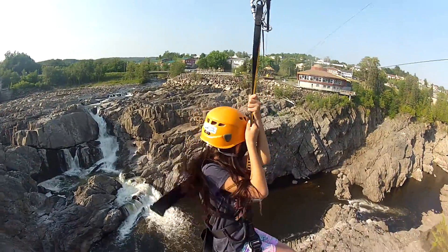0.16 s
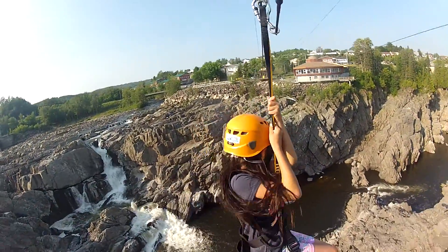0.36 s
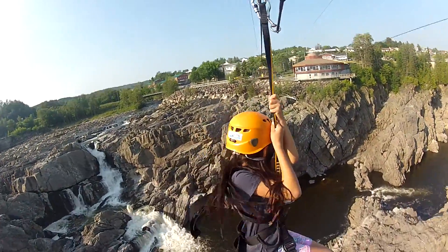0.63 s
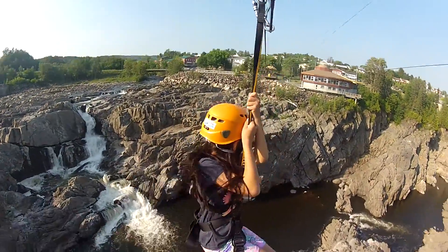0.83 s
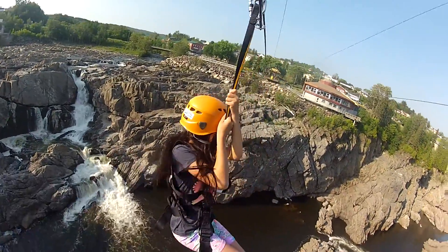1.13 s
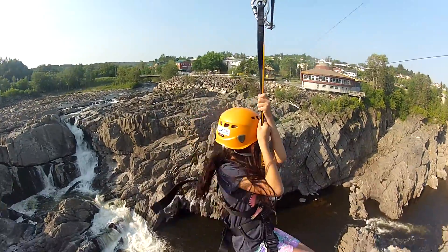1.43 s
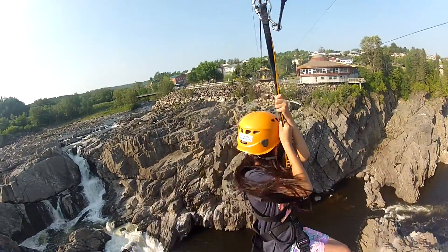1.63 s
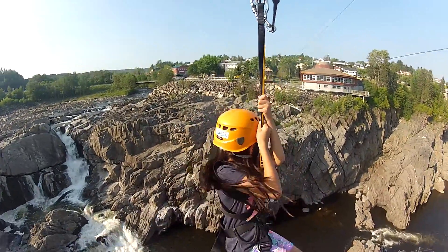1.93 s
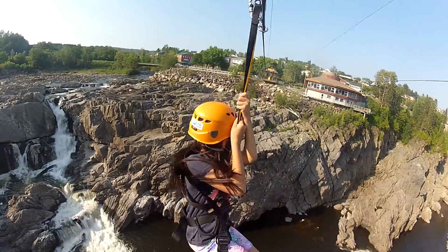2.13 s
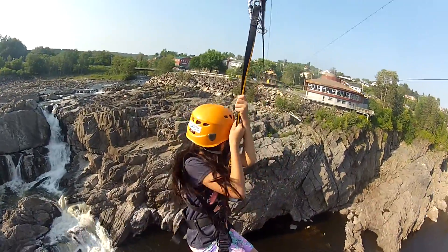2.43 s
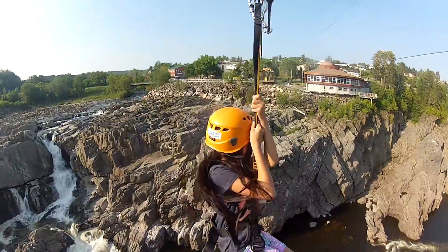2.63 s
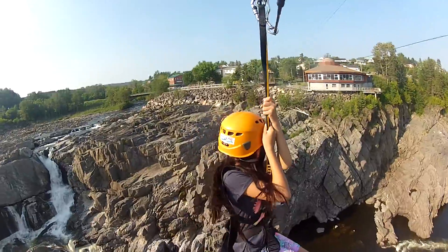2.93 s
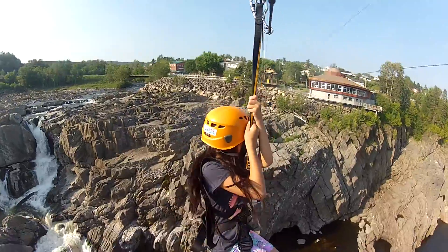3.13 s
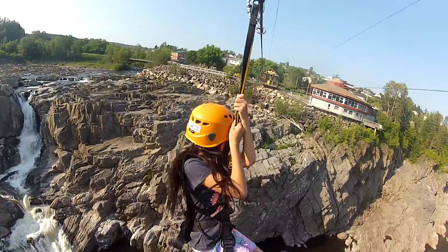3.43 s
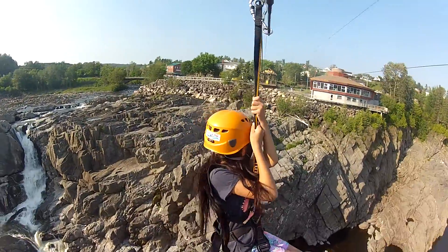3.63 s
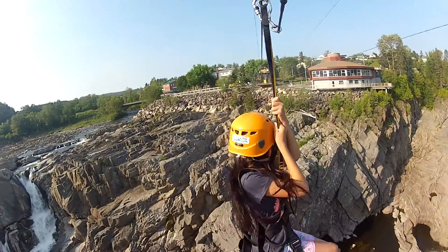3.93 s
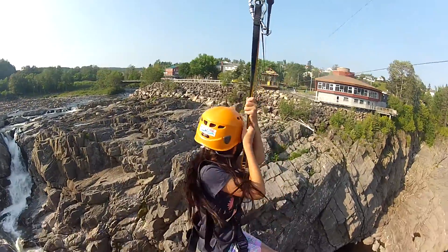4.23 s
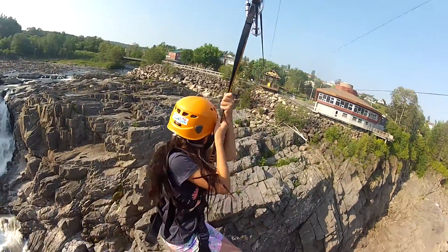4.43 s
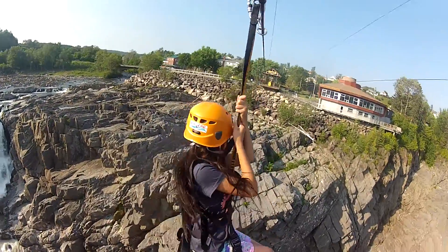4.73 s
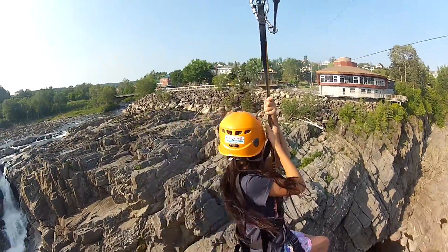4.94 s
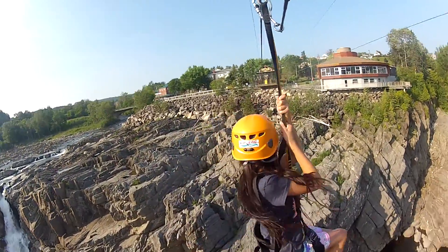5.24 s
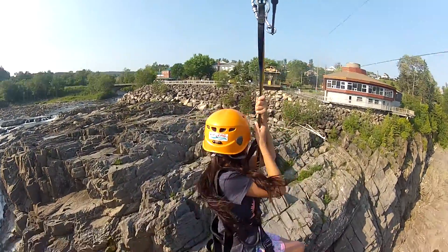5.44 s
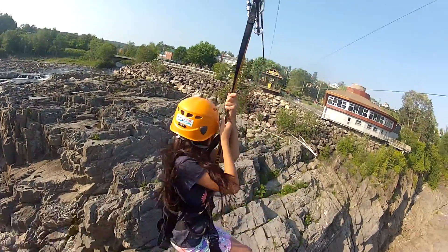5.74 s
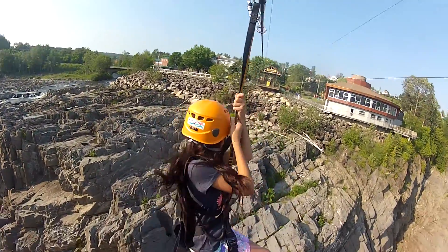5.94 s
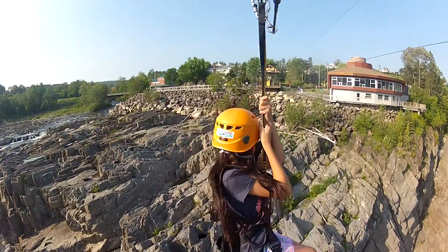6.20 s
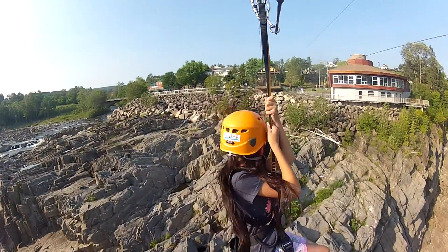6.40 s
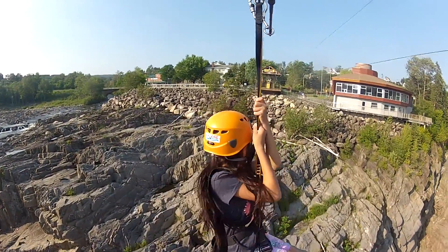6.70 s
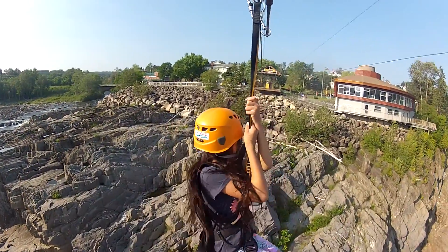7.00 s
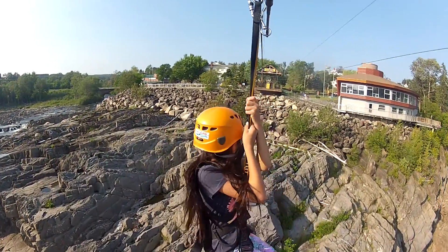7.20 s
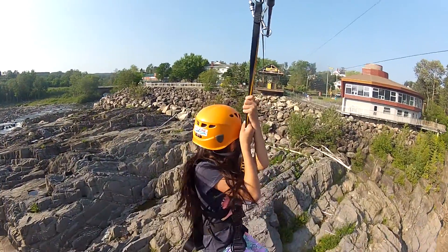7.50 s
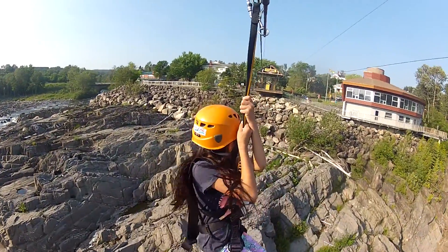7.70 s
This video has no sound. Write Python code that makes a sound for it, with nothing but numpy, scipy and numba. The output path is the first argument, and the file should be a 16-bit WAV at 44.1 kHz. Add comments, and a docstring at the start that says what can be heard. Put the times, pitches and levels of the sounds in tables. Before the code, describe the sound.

A zipline pulley rattles along a steel cable with a slowly falling whine, scattered knocks and wind rumbling on the microphone.

```python
"""Trolley slowing on a zipline

Steel wheels roll along a cable above a small camera in a closed case, and wind rumbles on the case.
Contact ticks and jolts excite the resonances of the trolley frame, and the cable strands passing under
the wheels whine, lower as it slows. The camera limits peaks; its coarse sampling adds mirrored treble."""
import sys
import numpy as np
from scipy import signal
from scipy.fft import rfft, irfft
from scipy.io import wavfile
from scipy.ndimage import uniform_filter1d, minimum_filter1d
from numba import njit

SR = 44100
rng = np.random.default_rng(int(sys.argv[2]) if len(sys.argv) > 2 else 0)


def dump_mix(stems):
    """Bounce the given channels to the path in sys.argv[1] as a 16-bit WAV at rate SR."""
    frames = np.atleast_2d(stems).T  # one column per channel
    limited = np.clip(frames, -1, 1)  # hard clip at full scale
    pcm = np.round(limited * 32767).astype(np.int16)
    wavfile.write(sys.argv[1], SR, pcm)


N = 346626


def undb(db):
    return 10 ** (np.asarray(db) / 20)


def at_rms(x, db):
    return x * undb(db) / np.sqrt(np.mean(x ** 2))


def curves(table):
    """Linear interpolation of each column over the times in the first."""
    times, *columns = np.transpose(table)
    return [np.interp(np.arange(N) / SR, times, column) for column in columns]


def wander(rate_hz):
    """Low-pass noise: random steps, smoothed twice, with a spread near 1."""
    hold = int(SR / rate_hz)
    steps = np.repeat(rng.standard_normal(N // 50), hold)[:N]
    return 1.24 * uniform_filter1d(uniform_filter1d(steps, hold), hold)


def minimum_phase(gain, size=4096):
    """Folding the cepstrum gives the most compact causal response with this gain."""
    cepstrum = irfft(np.log(gain), size)
    cepstrum[1:size // 2] *= 2
    cepstrum[size // 2 + 1:] = 0
    return irfft(np.exp(rfft(cepstrum)), size)[:size // 2]


# Spectrum of the wind. Each row: frequency in Hz, relative spectral density in dB.
WIND_SPECTRUM = [(12, -33), (20, -9), (97, 0.5), (172, -2.5), (321, -8.5), (450, -7), (580, -53),
                 (990, -120)]
# Gusts on the case. Each row: time in seconds, level in dB, relative level of the deep band in dB.
WIND_GUSTS = [(0, -30.5, -5), (.4, -40, -6), (.6, -35, -2), (1.3, -36.5, -7), (1.9, -37.5, -10),
              (2.3, -36, -6), (2.85, -38.5, -12), (3.0, -40.5, -12), (3.95, -39.5, -5), (4.15, -40, -8),
              (5.1, -36.5, -13), (5.5, -37.5, -9), (6.1, -36, -4), (6.7, -42.5, -9), (6.95, -37.5, -5),
              (7.4, -42, -16), (7.86, -38.5, -5)]
# Brief buffets and lulls. Each row: centre in seconds, length in seconds, level change in dB.
WIND_BUFFETS = [(.05, 0.11, -0.5), (0.187, .03, -3), (1.01, .05, 5), (1.3, .07, 5), (2.187, .04, 4),
                (2.885, .05, 7), (4.543, .05, 5.5), (5.078, 0.043, 5), (5.92, 0.057, 6.5),
                (6.144, 0.047, 9)]

def wind(split_hz=60):
    """Turbulent pressure on the case is low noise in gusts; the deep band also swells on its own."""
    hz, density_db = np.transpose(WIND_SPECTRUM)
    bins_hz = np.linspace(1, SR / 2, N // 2 + 1)
    spectrum = rfft(rng.standard_normal(N)) * undb(np.interp(np.log(bins_hz), np.log(hz), density_db))
    gust_db, deep_db = curves(WIND_GUSTS)
    rumble = at_rms(irfft(spectrum * (bins_hz > split_hz), N), 0)
    deep = at_rms(irfft(spectrum * (bins_hz <= split_hz), N), 0)
    deep *= undb(deep_db + 2.5 * wander(7.1))
    t = np.arange(N) / SR
    buffet_db = sum(db * np.exp(-(2 * (t - centre) / length) ** 4) for centre, length, db in WIND_BUFFETS)
    flutter_db = wander(12) + 0.56 * wander(25)
    return (rumble + deep) * undb(gust_db + buffet_db + flutter_db)


# Strands passing under the wheel. Each row: time in seconds, pitch in Hz, fundamental's drive in dB.
STRAND_PASSAGE = [(0, 712, -44), (1.2, 693, -45), (2.0, 679, -48), (2.9, 662, -41.5), (3.5, 647.5, -42.5),
                  (4.5, 615, -43.5), (5.0, 591.5, -40), (5.55, 564.5, -38.5), (5.95, 551, -44),
                  (7.2, 499, -48), (7.55, 484, -39), (7.86, 472, -38)]

def strand_whine(octave_db=-52):
    """Periodic forcing at the strand-passing rate: two harmonics that waver with the wheel's grip."""
    hz, db = curves(STRAND_PASSAGE)
    phase = 2 * np.pi * np.cumsum(hz * (1 + .001 * wander(6))) / SR
    grip = undb(wander(6))
    return np.sqrt(2) * grip * (undb(db) * np.sin(phase) + undb(octave_db) * np.sin(2 * phase))


# Hardest jolts of the wheels on the cable. Each row: time in seconds, peak of the push in dB.
WHEEL_JOLTS = [(.226, -9), (1.822, -10), (2.036, -5), (2.965, -10.5), (3.118, -8), (3.291, -9), (3.360, -6),
               (3.517, -9.5), (3.857, -9.5), (4.41, -15), (4.946, -11), (5.083, -8.5), (5.70, -8.5),
               (6.675, -7.5), (6.941, -10.5), (7.019, -10), (7.198, -5.5)]

def jolts(push_s=0.00017, bumps_per_s=1.2, bump_db=-16.5):
    """A soft impact is a force pulse that drives mostly low modes. Lighter bumps fall at random."""
    chance, weakness = rng.random((2, N))
    impulses = (chance < bumps_per_s / SR) * undb(bump_db - 6 * weakness)
    for time_s, db in WHEEL_JOLTS:
        impulses[int(time_s * SR)] = undb(db)
    t = np.arange(-200, 200) / SR
    return signal.fftconvolve(impulses, np.exp(-(t / push_s) ** 2), "same")


def rattle(ticks_per_s=2500, scatter_db=1.5, rolling_gain=0.8, drive_db=-17):
    """Wire ticking on wheel is shot noise over smooth rolling noise; both surge as the cable shakes."""
    chance, size, polarity = rng.random((3, N))
    tick_db = -scatter_db * np.log(1 - size)  # exponential distribution
    ticks = (chance < ticks_per_s / SR) * undb(tick_db) * np.sign(polarity - .5)
    contact = at_rms(ticks, 0) + rolling_gain * rng.standard_normal(N)
    return at_rms(contact * undb(0.66 * wander(90)), drive_db)


# Modes of frame and case. Each row: frequency in Hz, nominal width in Hz, relative level in dB.
FRAME_MODES = [(581, 51.8, 2), (647.4, 97, -0.3), (734, 90, 1.4), (863.5, 98, 0.5), (1022, 89, -2),
               (1134, 104, -7), (1328, 244, -5), (1442, 194, -3.5), (1586, 113, -4), (1882, 132, -6),
               (1970, 226, -10), (2170, 170, -17.5), (2502, 280, -15), (2940, 230, -7), (3153, 99, -5.5),
               (3277, 147, -8.5), (3773, 296, -8.5), (3896, 260, -10.5), (4290, 340, -16), (4845, 390, -22),
               (5260, 560, -25)]

def frame_response(skirt=1.615, taps=2048):
    """Modal resonances, summed in power, give an impulse response of unit energy."""
    hz = np.linspace(1, SR / 2, taps + 1)
    power = sum(undb(2 * db) / (1 + ((hz - mode_hz ** 2 / hz) / width) ** 2) ** skirt
                for mode_hz, width, db in FRAME_MODES)
    return at_rms(minimum_phase(np.sqrt(power), 2 * taps), 0) / np.sqrt(taps)


def scene():
    """Source and filter: the contact forces sound through the frame, and the wind adds directly."""
    force = rattle() + jolts() + strand_whine()
    trolley = signal.fftconvolve(force, frame_response())[:N]
    return (trolley + wind())[None]


@njit
def limiter(x, peaks, threshold, attack_s, release_s):
    """Gain falls inversely with a peak envelope once that passes the threshold."""
    attack, release = 1 / (attack_s * SR), 1 / (release_s * SR)
    limited, envelope = np.empty(len(x)), threshold
    for i in range(len(x)):
        target = max(peaks[i], threshold)
        envelope += (target - envelope) * (attack if target > envelope else release)
        limited[i] = x[i] * threshold / envelope
    return limited


def sample_and_hold(x, rate_hz=12000, hold=4):
    """Spectral imaging: samples held as steps mirror the spectrum about the sampling rate."""
    common = np.gcd(rate_hz, SR)
    coarse = signal.resample_poly(x, rate_hz // common, SR // common, window=("kaiser", 9.0))
    steps = np.repeat(coarse, hold)
    x = signal.resample_poly(steps, SR // common, hold * rate_hz // common)[:N]
    return np.pad(x, (0, N - len(x)))


def record(dry, antialias_hz=5700, top_hz=15300):
    """The camera limits peaks, then samples coarsely between two low-pass filters."""
    peaks = -minimum_filter1d(-np.abs(dry[0]), size=45)  # looks half a millisecond ahead
    x = limiter(dry[0], peaks, threshold=0.48, attack_s=0.00018, release_s=0.069)
    x = signal.sosfilt(signal.ellip(6, .5, 40, antialias_hz, fs=SR, output="sos"), x)
    x = sample_and_hold(x)
    return signal.sosfilt(signal.ellip(14, .2, 80, top_hz, fs=SR, output="sos"), x)[None]


dry = scene()
out = record(dry)
dump_mix(out)
```